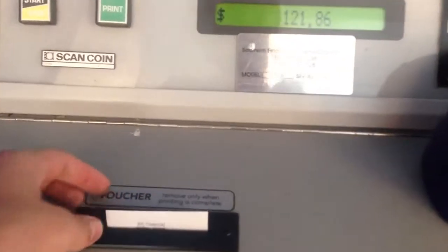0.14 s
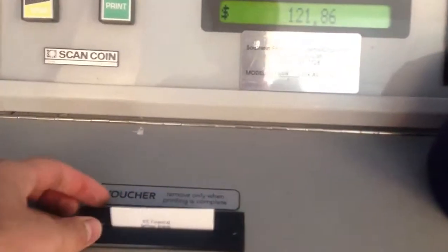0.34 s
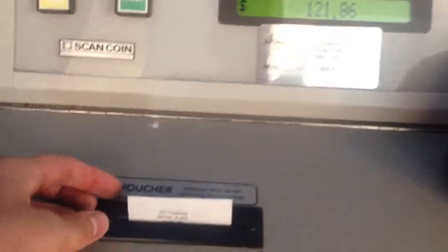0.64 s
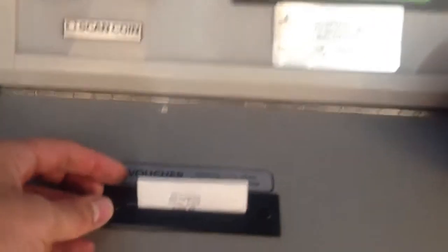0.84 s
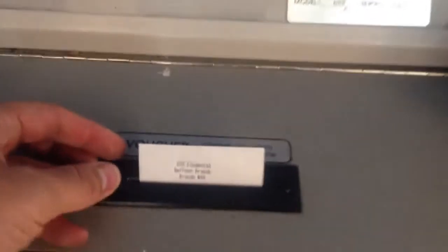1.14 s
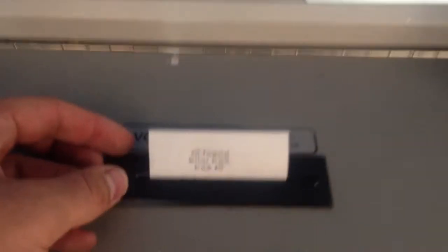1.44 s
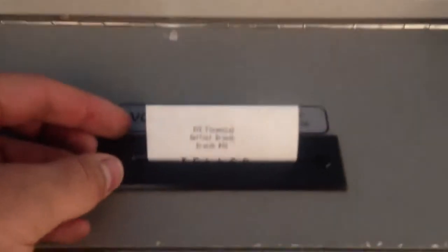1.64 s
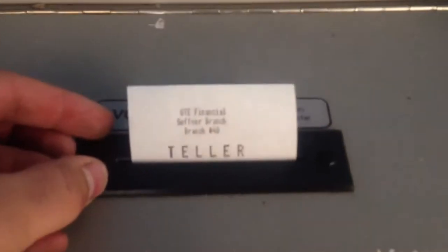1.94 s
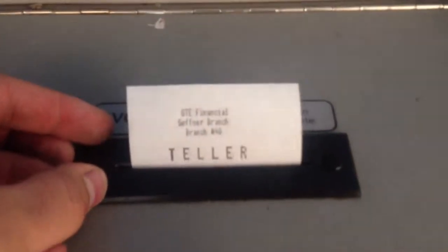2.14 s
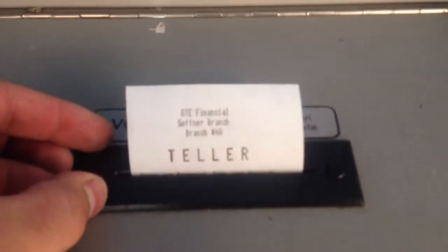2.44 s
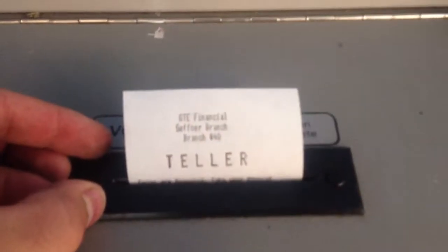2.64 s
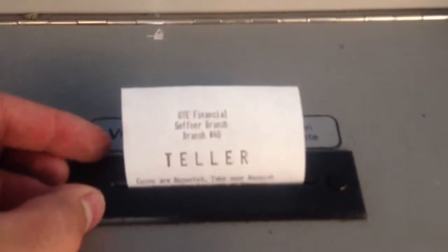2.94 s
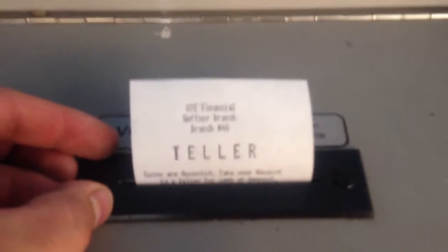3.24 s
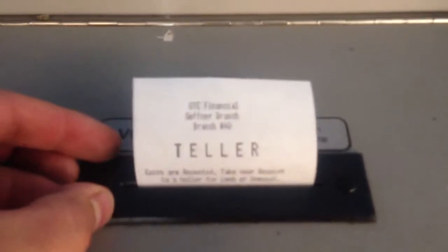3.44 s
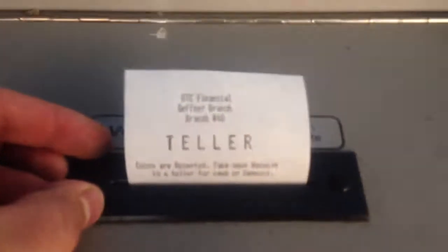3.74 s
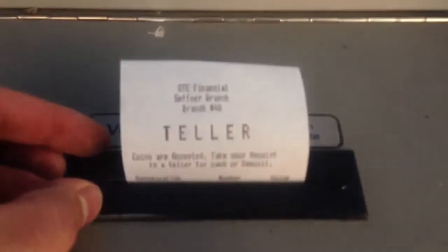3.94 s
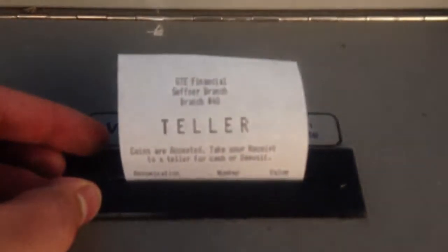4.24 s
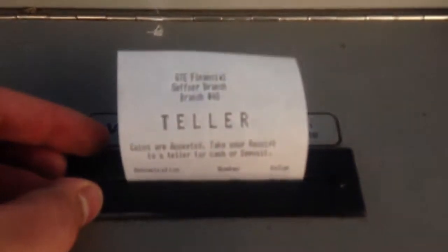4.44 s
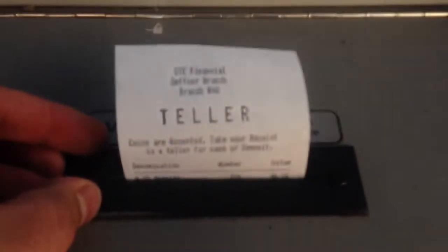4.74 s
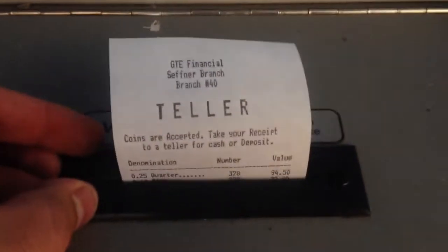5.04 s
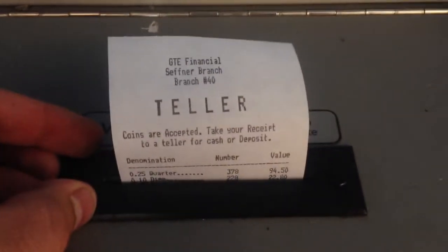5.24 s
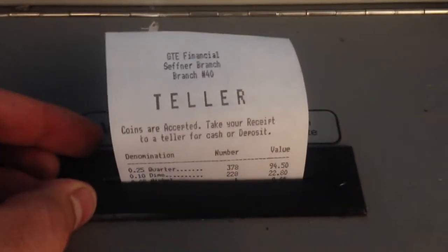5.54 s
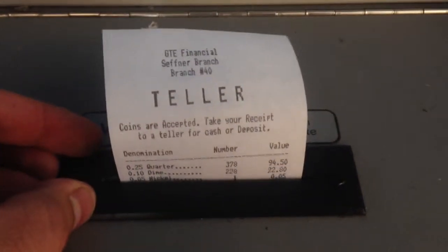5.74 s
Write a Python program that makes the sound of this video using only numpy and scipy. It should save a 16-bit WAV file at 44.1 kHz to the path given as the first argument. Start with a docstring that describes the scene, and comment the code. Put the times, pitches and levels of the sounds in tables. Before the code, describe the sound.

A small receipt printer chatters in fast raspy bursts inside a humming machine, soft thumps early, a sharp knock midway, paper sliding out.

```python
"""Cabinet hum, faint paper slide and soft knocks; a short zip; then runs of paper feeds, about 17 per second.
A receipt printer in a coin-counting machine feeds one run per line of text: filtered motor steps whine,
rattle the frame and rasp the paper, with three slip ticks per feed.
Early feeds thump; from about 2.8 s they drum fully over a stronger rumble and a two-mode drone.
Struck modes make the knocks, one of them sharp; short reflections add the housing."""
import sys
import numpy as np
from scipy import signal
from scipy.fft import rfft, irfft
from scipy.io import wavfile

SR = 44100
rng = np.random.default_rng(int(sys.argv[2]) if len(sys.argv) > 2 else 0)


def transcribe(u):
    """Save the signal u as a 16-bit wav file named by the first command-line argument.

    u: samples, shape (n,) or (channels, n), limited to [-1, 1]; the rate is SR.
    q: integer samples, one column per channel.
    """
    v = np.clip(np.atleast_2d(u).T, -1, 1)
    q = np.round(v * 32767).astype(np.int16)
    wavfile.write(sys.argv[1], SR, q)


N = 258867

# Levels marked rel_db are relative: later gains or filters apply.
# machine hum spectrum: freq_hz, density_rel_db
HUM_SPECTRUM = [(24, -104), (40, -32), (173, 6), (321, -18), (612, -6.5), (845, -14), (1110, -8.5),
                (1290, -15), (2010, -18.5), (3140, -22), (3740, -16), (6140, -23.5), (8270, -21),
                (9600, -23.5), (15000, -27)]
# wavering hum tones: freq_hz, width_hz, level_rel_db
HUM_TONES = [(87, 5.6, -7.5), (102.7, 9.6, -9.5), (170.8, 14, -1), (236, 35, -19), (435.7, 12, -10),
             (475, 22, -12.5)]
# cabinet low sound: start_s, rumble_rel_db, feed_drum_rel_db
RUMBLE_CURVE = [(0, -64.5, -54), (1.5, -63, -55), (2.76, -63, -52.5), (2.785, -51.5, -42), (3.3, -51, -46),
                (4.4, -50, -46), (4.8, -48.5, -47), (5.1, -48, -48.5), (5.87, -50, -44.5)]
# tones singing with the rumble: freq_hz, width_hz, level_rel_db
SINGING_TONES = [(897, 44, 2.5), (1350, 37, -6), (2593, 216, -3.5)]
# drone of two panel modes: start_s, lower_rel_db, upper_rel_db
DRONE_CURVE = [(0, -70.5, -80), (2.76, -71.5, -81), (2.85, -56, -60), (3.6, -63, -58.5),
               (4.0, -56.5, -58.5), (4.45, -65, -60), (4.62, -58, -52), (4.9, -58.5, -54.5),
               (5.0, -68, -63), (5.87, -57, -68)]
# cabinet blows: start_s, peak_rel_db, contact_brightness_hz
KNOCKS = [(0.052, -51, 200), (0.107, -47, 169), (0.167, -57, 197), (0.515, -46, 188), (2.972, -40, 224),
          (3.127, -32.5, 257), (3.212, -38, 297), (3.387, -32, 175), (3.4492, -20, 950),
          (3.6192, -34.5, 854)]
# cabinet modes under a blow: freq_hz, level_rel_db, t60_s
CABINET_MODES = [(119, -40, 0.032), (172, -11, 0.037), (285, -2.5, 0.025), (353, -1, 0.017),
                 (483, 2, 0.012), (635.6, -15, 0.019), (1010, -10, 0.0068)]
# paper sliding through the slot: start_s, rasp_rel_db, rustle_rel_db
SLIDE_CURVE = [(0.0, -67, -75), (0.85, -63.5, -72.5), (1.5, -57.5, -63), (1.85, -58, -61.5),
               (2.63, -54, -56.5), (3.28, -57, -58), (3.68, -48.5, -55.5), (3.94, -52.5, -56.5),
               (4.59, -55, -58.5), (4.71, -51, -53.5), (5.12, -55.5, -58), (5.87, -55.5, -56)]
# paper scuffing the slot: start_s, level_rel_db
SCUFF_CURVE = [(0, -93), (1.0, -77), (1.4, -65), (2.5, -63), (2.9, -70.5), (5.87, -84)]
# hollow slot resonances: freq_hz, width_hz, level_rel_db
SLOT_MODES = [(730, 90, 2), (1060, 210, -3.5), (1202, 62, 0)]
# paper rasp spectrum: freq_hz, density_rel_db
RASP_SPECTRUM = [(2000, -69), (4500, -47), (5950, -16), (6300, -13.5), (6720, -7), (7150, -9.5), (7600, -6),
                 (8100, 1.5), (8520, -0.5), (8900, -11), (9400, -18), (10500, -26), (12500, -31),
                 (15500, -52)]
# sheet rustle spectrum: freq_hz, density_rel_db
RUSTLE_SPECTRUM = [(500, -10.5), (1300, -6.5), (2050, -14), (2400, -4), (2650, -1.5), (3000, -2.5),
                   (3650, 0), (4000, -7), (4500, -0.5), (5250, -7), (5650, -9), (6700, 3.5), (9000, -21)]
# low drumming spectrum: freq_hz, density_rel_db
DRUM_SPECTRUM = [(50, -22), (120, -40), (165, -4.5), (240, -3.5), (320, -3.5), (390, -7.5), (460, -3),
                 (530, 0.5), (590, -9), (670, -2), (830, -20.5), (1300, -25), (1700, -40), (3000, -58)]
# panel modes kept ringing by the feeds: freq_hz, level_rel_db, t60_s
PANEL_MODES = [(174, -12.5, 0.49), (242, -2.5, 0.14), (308.4, -16, 0.67), (379.7, -6, 0.11),
               (406.7, -8.5, 0.21), (496.7, -1, 0.057), (542.5, -14, 0.32), (635, -7, 0.19),
               (669, 0, 0.071)]
# freedom of the sheet to drum: start_s, share_0_to_1
LOOSE_CURVE = [(2.74, 0.43), (2.78, 1)]
# printer frame resonances: freq_hz, width_hz, level_rel_db
FRAME_MODES = [(1775, 73, -11), (3677, 88, -1), (4540, 340, 1.5), (4654, 350, 1.5)]
# rattle power from the sheet instead of the frame: start_s, share_0_to_1
SHEET_SHARE = [(0, 0.67), (1.7, 0.07), (2.1, 0.6), (2.8, 0.8), (5.87, 0.92)]
# stepper motor: start_s, step_rate_hz, whine_rel_db
MOTOR_CURVE = [(.52, 900, -63.5), (.95, 894, -64.5), (1.2, 840, -62), (1.45, 840, -64), (1.73, 870, -59),
               (1.82, 970, -75), (2.2, 925, -74), (2.8, 970, -71), (5.87, 975, -73)]
# runs of even feeds: first_feed_s, last_feed_s, swell_db, rasp_rel_db, frame_rattle_rel_db,
# early_slip_rel_db, middle_slip_rel_db, late_slip_rel_db
TEXT_LINES = [(0.516, 0.923, -3, -60.5, -61.5, -53.5, -60, -54.5),
              (0.979, 1.788, 2.5, -49, -55.5, -48, -48, -41), (1.847, 1.961, 4, -68, -70, -65, -60, -56),
              (2.03, 2.44, 4, -48, -56, -50, -55, -42.5), (2.498, 2.905, 3, -40, -47.5, -43, -58, -37),
              (2.972, 3.378, 2, -50.5, -55, -42, -50, -41.5),
              (3.437, 3.844, -5.5, -51.5, -56, -40.5, -39, -41), (3.903, 4.021, 2, -68, -65, -60, -57, -59),
              (4.086, 4.491, 6, -47, -58, -42.5, -44, -40.5),
              (4.555, 4.962, -3.5, -37.5, -47.5, -31, -44, -39),
              (5.028, 5.434, 3.5, -53, -52, -36.5, -34.5, -40.5),
              (5.496, 5.897, -7, -47, -53.5, -33, -32, -35)]

HUM_REL_DB, HUM_TONES_REL_DB = -59, -63.5
DRONE_LOWER_HZ, DRONE_UPPER_HZ = 243.1, 386.6
REST_BEFORE_S, REST_WIDTH_S, REST_DB = 0.023, .007, -15.5
FEED_S, FEED_RISE_S, FEED_FALL_S, FEED_EVERY_S = .0245, .0035, .0025, .058
BLANK_DB = -26.5  # last feed moves blank paper: softer rasp, rattle and slips
FEED_SPREAD_DB, DRUM_SPREAD_DB = 1.0, 1.85
DRUM_PUSH_AFTER_S, DRUM_PUSH_S = (0.00093, 0.012), 0.0068  # two shakes per feed
SLIP_AFTER_S = (0.0053, 0.0142, 0.02436)
SLIP_JITTER_S, SLIP_SPREAD_DB = 0.00089, 3.5
SLIP_S, SLIP_RISE_S, SLIP_FALL_S = 0.0037, 0.0037, 0.0011
# one unbroken feed takes up the slack
ZIP_START_S, ZIP_S, ZIP_RISE_S, ZIP_FALL_S = .2145, 0.032, 0.0036, 0.0027
ZIP_STEP_HZ, ZIP_SAG_HZ_PER_S = 940, 1700
ZIP_RASP_REL_DB, ZIP_HISS_REL_DB, ZIP_FRAME_REL_DB, ZIP_WHINE_REL_DB = -42, -46.5, -48.5, -49.5
ZIP_WHINE_RISE_S, ZIP_WHINE_FALL_S = .02, .005
ZIP_STEP_TONE_REL_DB, ZIP_STEP_TONE_FALL_S = -52.5, 0.022
ZIP_PANEL_REL_DB, ZIP_PANEL_HZ, ZIP_PANEL_FALL_S = -58.5, 376, 0.078
CUTOFF_HZ = 15600


def from_db(db):
    """Decibels to gain."""
    return 10 ** (np.asarray(db) / 20)


def rms_one(x):
    """Scale to unit power."""
    return x / np.sqrt(np.mean(x ** 2) + 1e-20)


def noise():
    """White noise of unit power."""
    return rng.standard_normal(N)


def in_time(rows):
    """Interpolate each column to one value per sample."""
    time_s, *columns = np.transpose(rows)
    return [np.interp(np.arange(N) / SR, time_s, column) for column in columns]


def butterworth(x, order, hz, kind="low"):
    """Causal Butterworth filter."""
    return signal.sosfilt(signal.butter(order, hz, kind, fs=SR, output="sos"), x)


def drift(hz):
    """Lowpassed noise scaled to spread 1."""
    settled = butterworth(rng.standard_normal(N + SR), 2, hz)[SR:]
    return rms_one(settled)


def convolve_unit(x, response):
    """Convolve with a unit-energy response, which keeps white-noise power."""
    return signal.oaconvolve(x, response / np.linalg.norm(response))[:N]


def colour(x, spectrum, size=4096):
    """Causal minimum-phase filter built from the spectrum's folded cepstrum."""
    hz, db = np.transpose(spectrum)
    grid_hz = np.maximum(np.fft.rfftfreq(size, 1 / SR), 1)
    gain = from_db(np.interp(np.log(grid_hz), np.log(hz), db))
    cepstrum = irfft(np.log(gain))
    cepstrum[1:size // 2] *= 2
    cepstrum[size // 2 + 1:] = 0
    return convolve_unit(x, irfft(np.exp(rfft(cepstrum))))


def resonate(x, modes, size=2048):
    """Parallel decaying resonances of alternating sign; wider ones decay faster."""
    t = np.arange(size) / SR
    response = np.zeros(size)
    for k, (hz, width_hz, db) in enumerate(modes):
        decay = width_hz * np.exp(-np.pi * width_hz * t)
        response += (-1) ** k * from_db(db) * decay * np.cos(2 * np.pi * hz * t)
    return convolve_unit(x, response)


def modal_ring(modes, t):
    """Sum of struck modes, each falling 60 dB in its t60."""
    return sum(from_db(db - 60 * t / t60_s) * np.cos(2 * np.pi * hz * t) for hz, db, t60_s in modes)


def bursts(starts_s, levels_db, length_s, rise_s, fall_s, size=6000):
    """Envelopes that rise linearly and decay exponentially after their length."""
    t, out = np.arange(size) / SR, np.zeros(N + size)
    shape = np.minimum(t / rise_s, 1) * np.exp(-np.maximum(t - length_s, 0) / fall_s)
    for start_s, db in zip(starts_s, levels_db):
        at = int(np.clip(start_s * SR, 0, N))
        out[at:at + size] += from_db(db) * shape
    return out[:N]


def zip_burst(db, rise_s, fall_s):
    """Envelope of the single zip."""
    return bursts([ZIP_START_S], [db], ZIP_S, rise_s, fall_s)


def resting():
    """Gain dip as the mechanism rests before each line."""
    t = np.arange(N) / SR
    dips = sum(np.exp(-((t - line[0] + REST_BEFORE_S) / REST_WIDTH_S) ** 2) for line in TEXT_LINES)
    return from_db(REST_DB * dips)


def fan_hum():
    """Steady coloured noise plus narrow, wavering noise bands."""
    hum = from_db(HUM_REL_DB) * colour(noise(), HUM_SPECTRUM)
    return hum + from_db(HUM_TONES_REL_DB) * resonate(noise(), HUM_TONES, size=16384)


def rumble():
    """Lingering low noise excites the drum spectrum and singing tones."""
    rumble_db = in_time(RUMBLE_CURVE)[0]
    shake = noise() * from_db(rumble_db) * np.sqrt(resting())
    return from_db(-3.5) * colour(shake, DRUM_SPECTRUM) + from_db(-12) * resonate(shake, SINGING_TONES)


def drone():
    """Two panel modes sound as sines wavering in pitch and level."""
    out = np.zeros(N)
    for mode_hz, db in zip((DRONE_LOWER_HZ, DRONE_UPPER_HZ), in_time(DRONE_CURVE)):
        pitch_hz = mode_hz * (1 + 0.01845 * drift(10.15))
        phase = 2 * np.pi * np.cumsum(pitch_hz) / SR
        out += np.sqrt(2) * np.sin(phase) * from_db(db + 1.8 * drift(17))
    return out * resting()


def knocks(size=8000):
    """Blows ring cabinet modes; softer contact passes less treble, panels radiate little deep bass."""
    out = np.zeros(N + size)
    ring = butterworth(modal_ring(CABINET_MODES, np.arange(size) / SR), 2, 130, "high")
    for start_s, db, bright_hz in KNOCKS:
        blow = butterworth(ring, 4, bright_hz)
        at = int(start_s * SR)
        out[at:at + size] += from_db(db) * blow / np.abs(blow).max()
    return out[:N]


def stick_slip(hz, depth_db):
    """Bounded random gain as the paper grips and lets go."""
    return rms_one(from_db(depth_db * np.tanh(drift(hz))))


def slide():
    """Creeping paper makes fine friction noise that dips in the rests."""
    rasp_db, rustle_db = in_time(SLIDE_CURVE)
    grains = noise() * stick_slip(hz=112, depth_db=10.0) * resting()
    rasp = colour(grains * from_db(rasp_db), RASP_SPECTRUM)
    return rasp + colour(grains * from_db(rustle_db), RUSTLE_SPECTRUM)


def scuff():
    """Emerging paper rubs the slot: noise through hollow resonances."""
    return from_db(in_time(SCUFF_CURVE)[0]) * resonate(noise() * resting(), SLOT_MODES)


def stepper(rate_hz, jitter, grit):
    """Jolt and friction puff per motor step; whine at twice the step rate over a weaker step tone."""
    turn = np.cumsum(rate_hz * (1 + jitter * drift(200))) / SR
    step_pulses = np.diff(np.floor(turn), prepend=0)
    jolts = rms_one(step_pulses * (1 + 0.65 * noise()))
    friction = rms_one(np.exp(-2 * (turn % 1)) * noise())
    whine = np.sin(4 * np.pi * turn) + 0.25 * np.sin(2 * np.pi * turn)
    return rms_one(jolts + grit * friction), rms_one(whine)


def frame(x):
    """Printer frame resonates and passes little above them."""
    return butterworth(resonate(x, FRAME_MODES), 4, 5800)


def zip_body(rate_hz):
    """Jittered step-rate tone and a panel tone that rings on."""
    step_tone = np.sin(2 * np.pi * np.cumsum(rate_hz * (1 + 0.069 * drift(165))) / SR)
    panel = np.sin(2 * np.pi * ZIP_PANEL_HZ * np.arange(N) / SR)
    step_tone *= zip_burst(ZIP_STEP_TONE_REL_DB, ZIP_WHINE_RISE_S, ZIP_STEP_TONE_FALL_S)
    return step_tone + panel * zip_burst(ZIP_PANEL_REL_DB, ZIP_S, ZIP_PANEL_FALL_S)


def take_up():
    """Slack take-up: a bright zip whose step rate sags under load while its whine swells."""
    running_s = np.clip(np.arange(N) / SR - ZIP_START_S, 0, ZIP_S)
    rate_hz = ZIP_STEP_HZ - ZIP_SAG_HZ_PER_S * running_s
    steps, whine = stepper(rate_hz, jitter=.045, grit=1.2)
    steps = steps * zip_burst(0, ZIP_RISE_S, ZIP_FALL_S)
    rasp = from_db(ZIP_RASP_REL_DB) * colour(steps * stick_slip(hz=210, depth_db=4.2), RASP_SPECTRUM)
    hiss = from_db(ZIP_HISS_REL_DB) * butterworth(steps, 2, 7000)  # lowpassed
    rattle = from_db(ZIP_FRAME_REL_DB) * frame(steps)
    whine = whine * zip_burst(ZIP_WHINE_REL_DB, ZIP_WHINE_RISE_S, ZIP_WHINE_FALL_S)
    return rasp + hiss + rattle + whine + zip_body(rate_hz)


def drumming(starts_s, size=16000):
    """Each feed shakes the sheet twice and kicks panel modes, whose rings overlap."""
    time_s, _, level_db = np.transpose(RUMBLE_CURVE)
    drum_db = np.interp(starts_s, time_s, level_db) + DRUM_SPREAD_DB * rng.standard_normal(len(starts_s))
    pushes = sum(bursts(starts_s + after_s, drum_db, DRUM_PUSH_S, 0.0024, 0.0042)
                 for after_s in DRUM_PUSH_AFTER_S)
    shake = noise() * pushes
    kicks, t = np.zeros(N), np.arange(size) / SR
    kicks[np.clip(starts_s * SR, 0, N - 1).astype(int)] = from_db(drum_db)
    ring = modal_ring(PANEL_MODES, t) * np.minimum(t / 0.0043, 1)  # push builds up
    panels = signal.oaconvolve(kicks, ring)[:N]
    drum = from_db(-5.0) * colour(shake, DRUM_SPECTRUM) + from_db(-2.0) * panels
    # a short sheet favours the lowest panel mode
    loose = in_time(LOOSE_CURVE)[0]
    thump = butterworth(drum, 2, [130, 215], "band")
    return loose * drum + (1 - loose) * from_db(1.5) * thump


def ticks(starts_s, slips_db):
    """Three slips per feed make tiny noise scratches that swell and fade."""
    times_s = starts_s[:, None] + SLIP_AFTER_S + SLIP_JITTER_S * rng.standard_normal(slips_db.shape)
    db = slips_db + SLIP_SPREAD_DB * rng.uniform(-1, 1, slips_db.shape)
    swell = bursts(times_s.ravel() - SLIP_RISE_S / 2, db.ravel(), SLIP_S, SLIP_RISE_S, SLIP_FALL_S)
    scratch = rng.choice([-1, 1], N) * swell
    return colour(scratch, RASP_SPECTRUM) + from_db(-14) * colour(scratch, RUSTLE_SPECTRUM)


def feed_rows():
    """Feed rows: start_s, rasp_rel_db, rattle_rel_db, three slip_rel_db; each line ends on a blank feed."""
    rows = []
    for first_s, last_s, swell_db, *levels_db in TEXT_LINES:
        count = round((last_s - first_s) / FEED_EVERY_S) + 1
        for along in np.linspace(0, 1, count):
            change_db = swell_db * (along - .5) + BLANK_DB * (along == 1)
            rows.append([first_s + along * (last_s - first_s), *np.add(levels_db, change_db)])
    rows = np.array(rows)
    rows[:, 1:] += FEED_SPREAD_DB * rng.standard_normal((len(rows), 1))
    return rows


def feeds(starts_s, rasp_db, frame_db):
    """Motor-step bursts drive rasp, frame and sheet; whine and drumming share their starts."""
    rate_hz, whine_db = in_time(MOTOR_CURVE)
    sheet = in_time(SHEET_SHARE)[0]
    steps, whine = stepper(rate_hz, jitter=0.038, grit=1.5)
    steps = steps * stick_slip(hz=168, depth_db=2.5)
    rasp = colour(steps * bursts(starts_s, rasp_db, FEED_S, FEED_RISE_S, FEED_FALL_S), RASP_SPECTRUM)
    rattle = steps * bursts(starts_s, frame_db, FEED_S, FEED_RISE_S, FEED_FALL_S)
    body = frame(rattle * np.sqrt(1 - sheet)) + colour(rattle * np.sqrt(sheet), RUSTLE_SPECTRUM)
    whine_gate = bursts(starts_s, np.zeros(len(starts_s)), 0.033, 0.0038, 0.0029)
    whine = whine * from_db(whine_db + 4.6 * drift(37)) * whine_gate
    return rasp + body + from_db(-6.5) * whine + drumming(starts_s)


def shifting(x, depth_db):
    """Wandering paper contact trades 5.5-8 kHz strength against the rest."""
    band = butterworth(x, 2, [5500, 8000], "band")
    tilt = from_db(depth_db * np.tanh(drift(14)))
    return x / np.sqrt(tilt) + band * (tilt - 1 / np.sqrt(tilt))


def housing(x, t60_s, wet_db, size=8192):
    """Dense, short reflections inside the housing: decaying noise after 2 ms."""
    t = np.arange(size) / SR
    tail = rng.standard_normal(size) * from_db(-60 * t / t60_s) * (t > .002)
    return x + from_db(wet_db) * convolve_unit(x, tail)


def scene():
    """Printer and knocks in the housing, over hum, rumble and drone."""
    background = fan_hum() + rumble() + drone()
    rows = feed_rows()
    paper = feeds(*rows[:, :3].T) + ticks(rows[:, 0], rows[:, 3:])
    printer = knocks() + slide() + scuff() + take_up() + shifting(paper, depth_db=2.0)
    return (background + housing(printer, t60_s=0.088, wet_db=-11))[None]


def record(dry):
    """Small microphone drops deep bass; a steep filter cuts the top."""
    thin = butterworth(dry, 2, 62, "high")
    return signal.sosfilt(signal.ellip(10, .1, 70, CUTOFF_HZ, fs=SR, output="sos"), thin)


dry = scene()
out = record(dry)
transcribe(out)
```